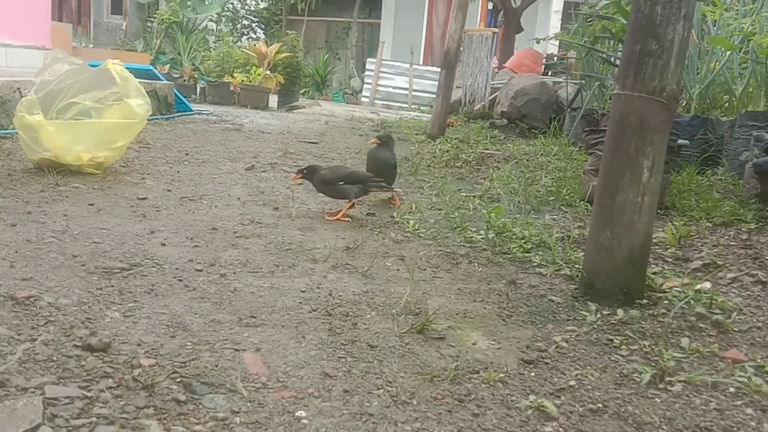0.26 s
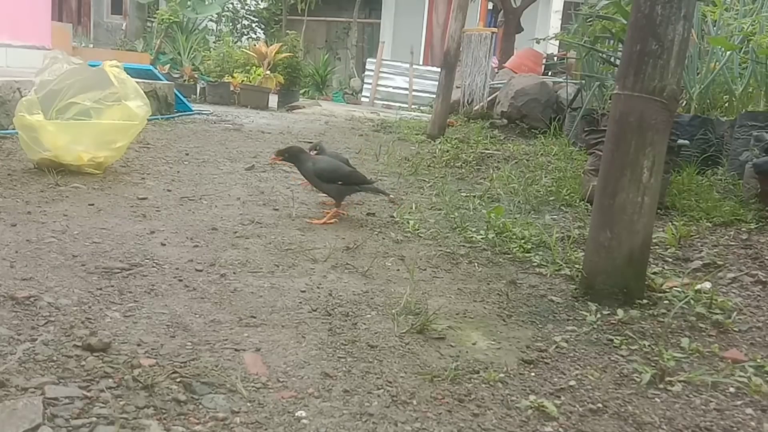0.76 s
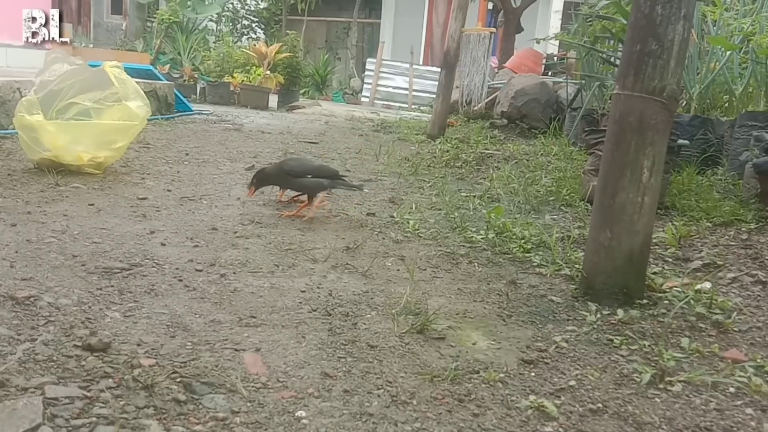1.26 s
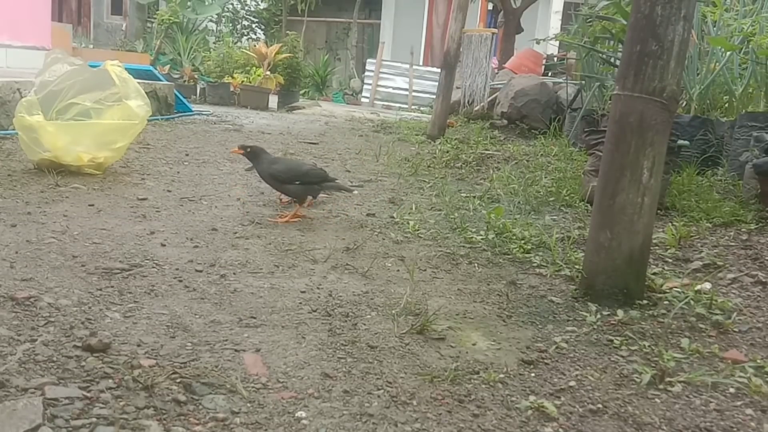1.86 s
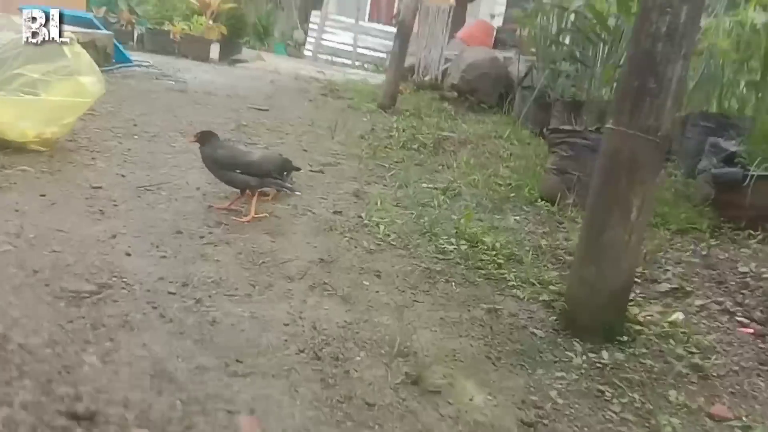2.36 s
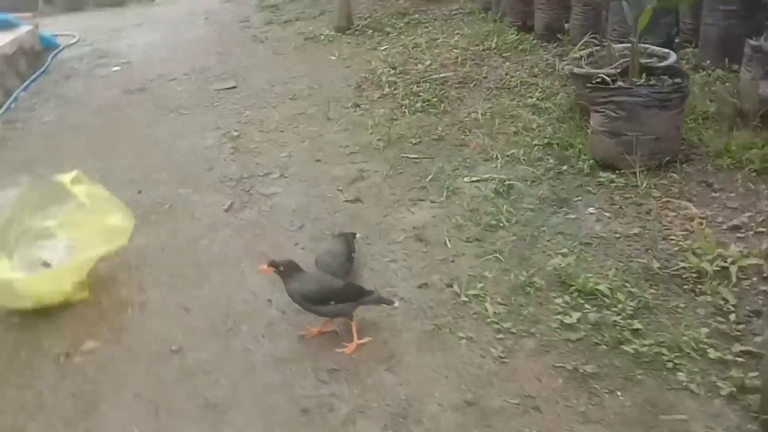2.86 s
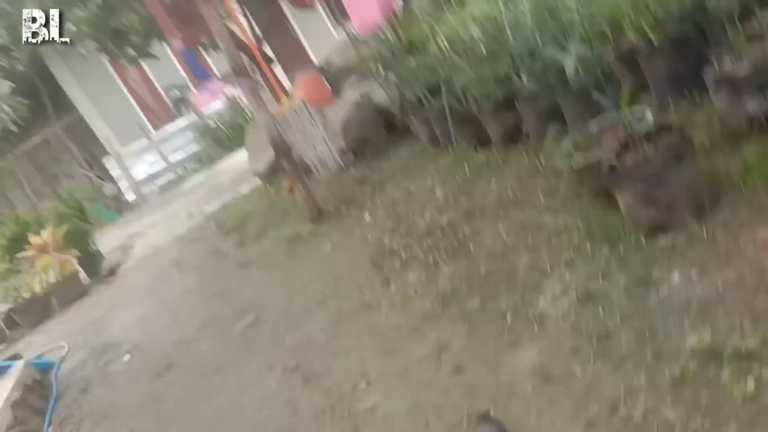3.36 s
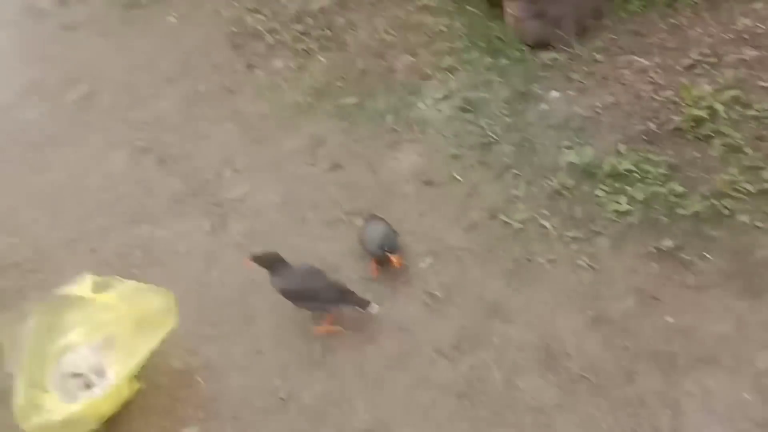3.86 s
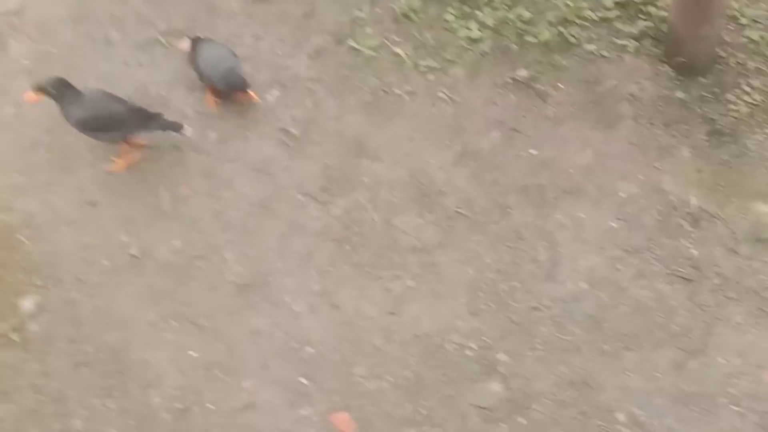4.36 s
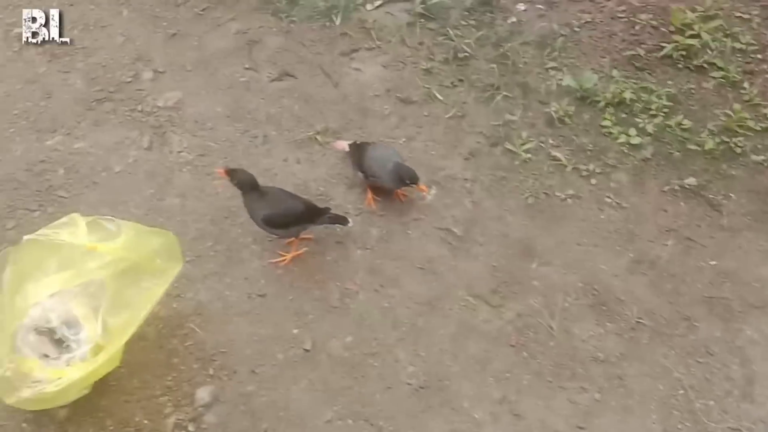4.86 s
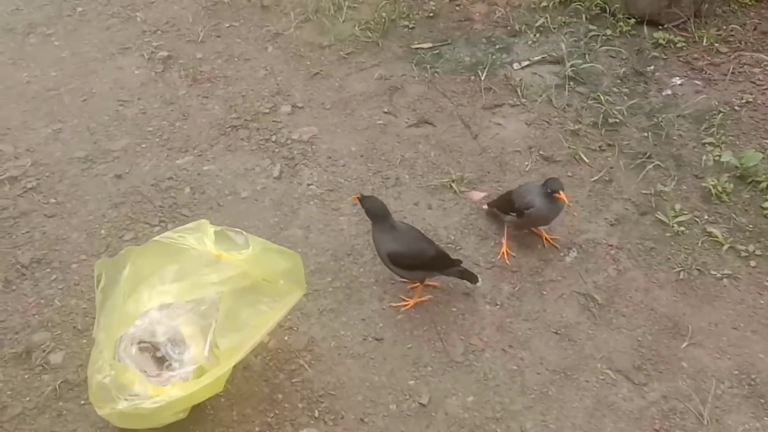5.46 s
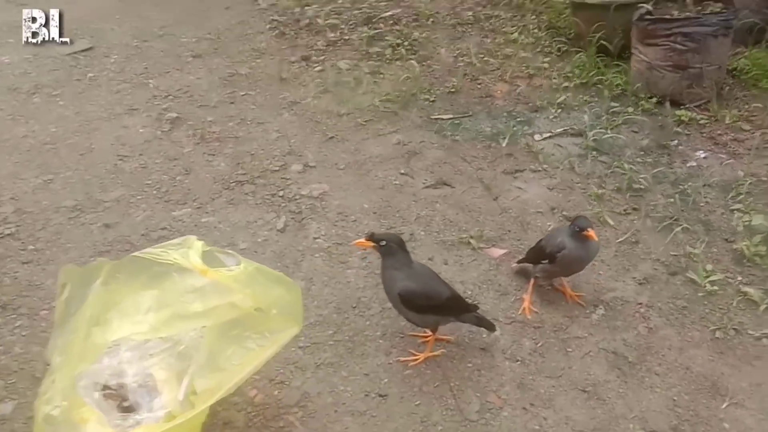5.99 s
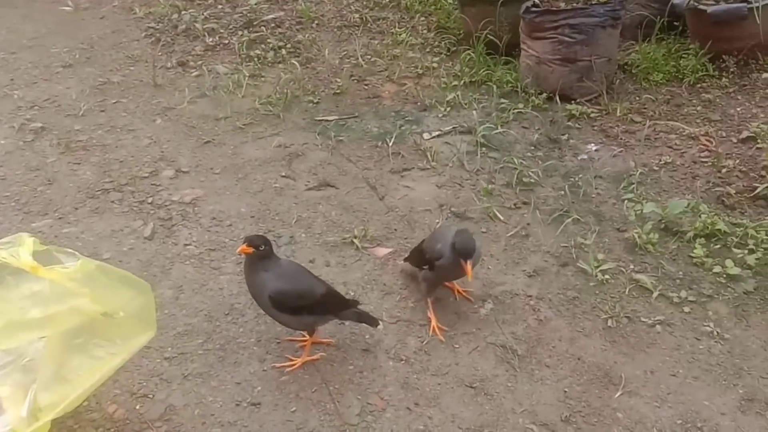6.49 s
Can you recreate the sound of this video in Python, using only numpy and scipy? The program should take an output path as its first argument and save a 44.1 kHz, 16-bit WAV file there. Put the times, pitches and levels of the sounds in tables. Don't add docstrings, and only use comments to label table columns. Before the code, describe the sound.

Two mynas whistle and squawk harshly in a gravel yard, with clicking, scuffing grit, chirping birds further off and a low distant rumble.

```python
import sys
import numpy as np
from scipy import signal
from scipy.fft import rfft, irfft, next_fast_len
from scipy.io import wavfile
from scipy.ndimage import uniform_filter1d, map_coordinates

SR = 44100
rng = np.random.default_rng(int(sys.argv[2]) if len(sys.argv) > 2 else 0)


def dump_mix(stems):
    frames = np.atleast_2d(stems).T
    limited = np.clip(frames, -1, 1)
    pcm = np.round(limited * 32767).astype(np.int16)
    wavfile.write(sys.argv[1], SR, pcm)


def boost(x):
    u = np.asarray(x, float) / 20
    return 10 ** u


N = 296793
T = np.arange(N) / SR

# (time [s], pitch [Hz], level [dB])
SQUEAK_CURVE = [
    (0.065, 920, -44),
    (0.098, 1034, -39),
    (.126, 1288, -33),
    (0.146, 1460, -40),
    (0.21, 1760, -40),
    (0.245, 2450, -38),
    (0.29, 2620, -38),
    (0.32, 1480, -43),
    (0.38, 1300, -50),
]
# (time [s], pitch [Hz], level [dB])
LONG_WHISTLE_CURVE = [
    (2.27, 1835, -65),
    (2.286, 1896, -41),
    (2.33, 1921, -29),
    (2.346, 1874, -38),
    (2.353, 1871, -23),
    (2.376, 1943, -20),
    (2.408, 1944, -11),
    (2.424, 1905, -26),
    (2.43, 1910, -17),
]
HELD_WHISTLE_CURVE = [
    (2.42, 1890, -20),
    (2.464, 1863, -14),
    (2.512, 1848, -29),
    (2.536, 1832, -19),
    (2.568, 1822, -24),
    (2.58, 1841, -33),
]
SOBBING_WHISTLE_CURVE = [
    (2.574, 1825, -30),
    (2.576, 1826, -34),
    (2.59, 1781, -21),
    (2.598, 1722, -30),
    (2.606, 1742, -21),
    (2.632, 1726, -38),
    (2.636, 1771, -37),
    (2.66, 1712, -43),
]
FALLING_WHISTLE_CURVE = [
    (2.744, 2050, -45),
    (2.754, 2085, -25),
    (2.762, 2164, -32),
    (2.772, 2155, -32),
    (2.784, 2077, -16),
    (2.806, 1955, -17),
    (2.844, 1849, -19),
    (2.866, 1809, -24),
    (2.895, 1812, -36),
]
HIGH_WHISTLE_CURVE = [
    (3.955, 3807, -50),
    (3.967, 4044, -38),
    (4.007, 3918, -22),
    (4.031, 3736, -26),
    (4.07, 3726, -45),
]
# (start [s], length [s], first pitch [Hz], last pitch [Hz], level [dB])
PIPS = [
    (5.709, .03, 2750, 2680, -41),
    (3.95, .011, 6150, 6150, -36),
    (6.382, .012, 5850, 6200, -8.5),
]
YELPS = [
    (2.427, .007, 2600, 2480, -29),
    (2.434, .012, 2520, 2330, -26),
    (2.448, .038, 2290, 2210, -23),
    (2.531, .008, 3650, 3800, -21),
    (2.538, .008, 3900, 4250, -13.5),
    (2.545, .007, 4250, 4400, -15),
]
RASPS = [(2.464, .022, 3250, 3250, -14.5), (2.464, .026, 6200, 6200, -15), (2.465, .012, 5200, 5400, -20),
         (2.484, .02, 3100, 3500, -16), (2.495, .01, 6700, 7100, -20), (2.501, .008, 3600, 5000, -13),
         (2.509, .01, 4900, 3300, -14), (2.519, .012, 4600, 4700, -18), (2.518, .014, 3400, 3300, -19),
         (2.51, .014, 8000, 8200, -23), (2.53, .028, 7700, 7700, -20), (2.553, .009, 5250, 4900, -10),
         (2.561, .01, 4700, 5200, -13), (2.556, .03, 4200, 4200, -16), (2.57, .018, 5300, 5000, -21),
         (2.772, .02, 6400, 6000, -35), (2.774, .018, 4700, 3900, -32), (5.71, .012, 5500, 5500, -42),
         (5.72, .008, 5000, 5100, -26), (5.723, .02, 6400, 5800, -17), (5.727, .018, 5500, 5000, -16),
         (5.742, .018, 5000, 4500, -15), (5.748, .012, 4300, 3700, -20), (5.757, .04, 3500, 3600, -24),
         (5.75, .022, 7200, 7000, -18), (5.74, .025, 9400, 8800, -36), (5.765, .016, 5600, 5900, -15),
         (5.779, .012, 6200, 6000, -14), (5.772, .02, 7300, 7200, -21), (5.77, .03, 4500, 4900, -19),
         (5.79, .022, 5900, 5500, -19), (5.8, .05, 5800, 5300, -26), (5.8, .05, 4400, 4600, -30),
         (6.373, .008, 5400, 6000, -26), (1.652, .013, 6200, 4500, -25), (1.815, .014, 6300, 5600, -36)]
# (start [s], end [s], level [dB])
HISSES = [
    (2.428, 2.47, -28),
    (2.46, 2.585, -25),
    (2.772, 2.792, -38),
    (5.725, 5.82, -27),
]
# (frequency [Hz], level [dB per Hz])
HISS_COLOUR = [(2000, -40), (3000, -6), (5200, 0), (8500, -9), (11000, -13), (15000, -8), (16000, -30)]
# (time [s], peak [dB], centre [Hz])
CRACKS = [(.2144, -30, 5200), (.232, -33, 7200), (.283, -26, 5500), (.361, -30, 6500), (2.781, -27, 6500),
          (.2573, -24, 6160), (.4673, -24, 5900), (.5713, -27, 4500), (.9824, -24, 5700),
          (1.0172, -19.5, 5460), (1.3778, -15, 6500), (1.4292, -18, 4840), (1.6545, -24, 5800),
          (1.714, -23, 5940), (2.0803, -24, 5360), (2.1685, -21, 4200), (3.264, -18, 7600),
          (3.7545, -24, 4500), (3.7578, -2.5, 3500), (3.8496, -22, 7500), (3.8561, -19, 2600),
          (3.8846, -33, 7100), (4.4019, -34, 5840), (4.7432, -26, 7300), (4.807, -27, 7400),
          (6.373, -22, 8500), (6.4696, -31, 9000)]
KNOCKS = [(.273, -20, 6000), (1.0396, -19, 3000), (1.1265, -32, 4700), (1.3582, -22, 4650),
          (1.5412, -30, 1900), (1.5686, -25, 3000), (1.9027, -36, 7460), (3.2159, -27, 6130),
          (3.2914, -33.5, 5560), (3.592, -35.5, 5800), (3.606, -36, 5450), (4.7125, -26, 6900),
          (5.2374, -27, 2500), (5.293, -44, 1300)]
# (time [s], peak [dB], time to fall 60 dB [s])
SPRAYS = [(.2563, -33, .04), (.2723, -33, .08), (.3257, -36, .15), (.4663, -39, .1), (.5701, -39, .06),
          (.982, -40, .15), (1.0181, -34, .05), (1.1248, -48, .04), (1.2695, -50, .03), (1.3049, -40, .15),
          (1.357, -35, .2), (1.4296, -28, .06), (1.5678, -42, .04), (1.6167, -44, .15), (1.6496, -33, .1),
          (1.71, -35, .08), (1.8128, -41, .1), (1.8861, -38, .1), (2.0602, -46, .08), (2.0807, -42, .04),
          (2.169, -30, .04), (3.1744, -46, .05), (3.349, -45, .05), (3.4443, -38, .08), (3.4638, -38, .1),
          (3.5805, -44, .02), (3.62, -45, .02), (3.7578, -22, .12), (3.8561, -34, .05), (4.7144, -34, .05),
          (4.7933, -38, .03), (4.9564, -47, .05), (5.0302, -44, .05), (5.0741, -35, .06),
          (5.0906, -38, .12), (5.1993, -40, .1), (5.4528, -47, .04), (5.5171, -49, .04), (6.4689, -36, .04),
          (6.646, -45, .04)]
# (frequency [Hz], level [dB per Hz])
SPRAY_COLOUR = [(1500, -22), (3000, -6), (7500, 1), (10000, -5), (13000, -8), (15000, -1), (16000, -8)]
# (time of top [s], grit [dB],
# rise per 20 dB [s], fall per 20 dB [s], body over grit [dB])
SCUFFS = [(.294, -41, .17, .3, 0), (.48, -49, .03, .05, -2), (.574, -38.5, .02, .035, -1),
          (.8, -61, .3, .1, -8), (1.016, -39, .04, .09, 1), (1.312, -47, .035, .05, -15),
          (1.374, -35, .03, .1, -1), (1.65, -36.5, .045, .11, -4), (1.824, -46, .04, .2, -7),
          (2.18, -51, .4, .2, -5), (3.25, -53, .15, .2, -3), (3.266, -38, .013, .011, -18),
          (3.462, -46, .05, .1, -1), (3.8, -56, .03, 1.5, -5), (4.3, -54, .2, .15, -4),
          (4.745, -45, .06, .015, -10), (4.812, -47, .02, .015, -25), (4.9, -57, .15, .2, 4),
          (5.1, -38, .05, .08, -2), (5.208, -41, .02, .045, -1), (5.472, -53, .03, .15, -4),
          (6.088, -55, .2, .5, -6), (6.5, -55, .03, 1.5, -7)]
# (frequency [Hz], level [dB per Hz])
GRIT_COLOUR = [(3820, -32), (6500, -5), (7390, 4), (10400, -22.5), (13500, -23), (14900, -13), (16000, -22)]
BODY_COLOUR = [(410, -27), (700, -9.5), (952, -10), (1250, -13), (1830, -3), (2460, -3), (6500, -6),
               (8450, -56), (14300, -120)]
# (start [s], end [s], level [dB])
HOLLOW_SWELLS = [
    (.05, .4, -42),
    (1.1, 1.7, -52),
    (1.8, 2.3, -50),
    (3.1, 3.75, -57),
    (4.3, 5.5, -50),
    (6.1, 6.73, -58),
]
# (time [s], pitch [Hz], level [dB])
CLEAR_CALLS = [
    [(.005, 3167, -46), (.015, 3144, -38), (.046, 3140, -33), (.058, 3217, -48)],
    [(.072, 4080, -42), (.079, 4182, -31), (.1, 4218, -39), (.13, 4185, -48)],
    [(.186, 3500, -42), (.202, 3360, -29), (.232, 3348, -37), (.241, 3290, -30), (.277, 3080, -33),
     (.301, 3042, -31), (.325, 3000, -44)],
    [(1.24, 2330, -52), (1.271, 2628, -41), (1.293, 2761, -50), (1.3, 2785, -34), (1.343, 2885, -42),
     (1.38, 2950, -50)],
]
CLEAR_CHAOS = .04, .08, .3, .07
# (start [s], length [s], first pitch [Hz], last pitch [Hz], level [dB])
FAR_CHIRPS = [(.615, .075, 3080, 3400, -34), (.678, .04, 4100, 3950, -36), (.848, .03, 3200, 3120, -42),
              (.985, .06, 2950, 3250, -33), (1.042, .08, 3470, 3370, -31), (1.15, .05, 1720, 1800, -50),
              (1.178, .045, 2600, 1650, -44), (1.215, .04, 1700, 2400, -49), (1.415, .065, 3050, 3150, -34),
              (1.47, .06, 3050, 3300, -41), (1.595, .04, 2750, 2650, -43), (1.675, .06, 2400, 2800, -46),
              (3.44, .09, 2520, 2600, -53), (3.57, .05, 3900, 3780, -50), (3.63, .1, 3620, 3480, -53)]
# (start [s], end [s], first pitch [Hz], last pitch [Hz], level [dB])
CHATTER = [(.066, 0.138, 3500, 3680, -39.5), (0.21, 0.35, 2700, 1900, -40), (0.368, 0.499, 2420, 2103, -44),
           (0.505, 0.594, 2303, 2530, -48.5), (0.666, 0.795, 3336, 3620, -50),
           (0.858, 0.961, 3500, 3750, -55), (1.174, 1.243, 2687, 1980, -45.5),
           (1.44, 1.56, 2406, 2870, -43), (1.456, 1.519, 3850, 3800, -46.5),
           (2.037, 2.154, 3280, 3580, -59), (2.054, 2.152, 4700, 4620, -50.5),
           (2.89, 3.053, 3150, 2800, -52), (3.528, 3.572, 3200, 3380, -47.5),
           (3.711, 3.747, 2610, 2658, -46), (5.201, 5.227, 2605, 2530, -36),
           (6.527, 6.677, 3890, 4000, -60.5), (2.778, 2.789, 4280, 4100, -24),
           (3.947, 3.974, 3100, 3130, -53), (3.942, 4, 5300, 5020, -51), (5.725, 5.765, 2720, 2620, -51),
           (.63, .67, 2150, 2250, -49), (.67, .76, 2900, 2500, -47), (.85, .92, 2900, 2650, -51),
          (1.07, 1.13, 2200, 2150, -53), (1.59, 1.65, 3100, 2400, -47), (1.68, 1.76, 3000, 3200, -50),
          (3.04, 3.14, 2300, 2250, -52), (3.35, 3.42, 1950, 2050, -55), (3.52, 3.62, 2550, 2450, -55),
          (3.68, 3.75, 3450, 3300, -50), (3.7, 3.75, 2150, 2100, -52), (4.02, 4.11, 2100, 1700, -56),
          (4.76, 4.9, 3600, 3900, -60), (4.88, 4.98, 2300, 2900, -58), (5.03, 5.07, 2200, 2000, -52),
          (5.45, 5.51, 1900, 1950, -57), (6.05, 6.3, 2000, 2300, -60), (6.58, 6.64, 2900, 2000, -56)]
# (time [s], level [dB], time to fall 60 dB [s])
TANK_BLOWS = [
    (1.62, -33, .3),
    (1.79, -36, .4),
    (1.93, -40, 3.2),
]
# (start [s], end [s], pitch [Hz], level [dB])
HUMS = [
    (0.03, 0.403, 280.2, -51),
    (0.445, 0.894, 258, -58),
    (1.96, 2.356, 281.3, -55),
    (4.355, 4.69, 277, -58.5),
    (5.05, 5.35, 278, -62),
    (5.416, 5.982, 171.6, -41.5),
    (5.66, 6, 280, -56),
    (6.304, 6.697, 278, -57.5),
    (6.305, 6.607, 137.7, -43),
]
# (time [s], level [dB])
TRAFFIC_LEVEL = [(0, -50), (0.19, -43), (0.72, -44), (0.97, -51), (1.1, -41), (1.26, -49), (1.62, -45),
                 (1.69, -40), (1.8, -45), (2, -40), (2.7, -50), (3.5, -50), (3.65, -45), (4.12, -51),
                 (4.46, -44), (5.29, -53), (5.36, -43), (6.73, -45)]
# (frequency [Hz], level [dB per Hz])
TRAFFIC_COLOUR = [(15, -70), (25, -30), (43, -17), (63, -7), (128, 3.5), (243, -11), (352, -14.5),
                  (392, -27.5), (600, -20.5), (780, -45), (1320, -120)]
AIR_COLOUR = [(180, -34.5), (300, -3), (1010, -12.5), (1230, 0), (1430, -12.5), (4300, -14), (4590, -10.5),
              (4990, -24.5), (6000, -9), (6620, -22.5), (7570, -13.5), (10000, -33), (13500, -38.5),
              (15000, -20.5), (16000, -31)]
STREET_COLOUR = [(150, -38), (250, 1), (500, -4.5), (900, -6.5), (1300, -38.5)]
# (start [s], end [s], extra level [dB])
STREET_SWELLS = [
    (.8, 1.5, 2),
    (1.55, 2.45, 5),
    (3.8, 4.1, 3),
    (5.3, 6.73, 3),
]
# (frequency [Hz], time to fall 60 dB [s])
WALL_FADES = [(500, 0.12), (2000, 0.28), (6000, 0.25), (12000, 0.23)]
# (frequency [Hz], gain [dB])
PORT_GAIN = [(300, 1), (1000, 2), (8000, 1.5), (10000, -5), (13500, -11), (15400, -5), (15800, -35)]


def mynas():
    return squeak() + boost(-2.2) * whistles() + pips() + yelps() + beaked_rasps()


def squeak():
    rows = coloured(SQUEAK_CURVE, slope_db=-14, per_db=0, per_octave=4)
    voice = note(rows, edge=.005, chaos=.21, lumps=1.5)
    return filtered(voice, lambda f: (1 + 3.5 * peak(f, 7200, 3000)) / (1 + (f / 9500) ** 8))


def whistles():
    chaos = .015
    out = np.zeros(N)
    for curve in (LONG_WHISTLE_CURVE, FALLING_WHISTLE_CURVE, HIGH_WHISTLE_CURVE):
        rows = coloured(curve, slope_db=-20.5, per_db=.35, per_octave=12)
        out += note(rows, edge=.0045, chaos=chaos, droop=.45)
    for curve in (HELD_WHISTLE_CURVE, SOBBING_WHISTLE_CURVE):
        out += note(curve, edge=.004, chaos=chaos, slope_db=-38)
    return filtered(out, lambda f: 1 - .9 * peak(f, 10200, 4000))


def pips():
    return sum(note(burst(row), edge=.002, slope_db=-27, chaos=.08) for row in PIPS)


def yelps():
    out = np.zeros(N)
    for row in YELPS:
        rows = coloured(burst(row), slope_db=3, per_db=0, per_octave=20)
        out += note(rows, edge=.0016, chaos=.12, droop=1.4)
    return filtered(out, lambda f: (.6 + 1.6 * peak(f, 4500, 1500)) / (1 + (f / 10500) ** 8))


def beaked_rasps():
    voice = np.zeros(N)
    for row in RASPS:
        rows = coloured(burst(row), slope_db=-9, per_db=0, per_octave=5)
        voice += note(rows, edge=.0022, chaos=.36)
    hiss_gain = sum(boost(db) * swell(a, b) for a, b, db in HISSES)
    rasps = boost(.3) * voice + boost(3 * wobble(400)) * noise(HISS_COLOUR) * hiss_gain

    def beak(bass_hz, top_hz):
        return filtered(rasps, lambda f: 1 / (1 + (bass_hz / (f + 1)) ** 18) / (1 + (f / top_hz) ** 4))

    narrow = beak(2500, 1.15 * 10500)
    wide = filtered(beak(3330, 2 * 10500), lambda f: 1 - .65 * peak(f, 9000, 2500))
    return np.where(T < 5, narrow, wide)


def clicks():
    size = 900
    out, t = np.zeros(N + size), np.arange(size) / SR
    hits = [(*row, -21) for row in CRACKS] + [(*row, -5) for row in KNOCKS]
    c, d = signal.iirpeak(3600, 1.2, SR)
    for s, db, hz, knock_db in hits:
        fade = boost(-60 * t / .008) + boost(-13 - 60 * t / .03)
        strike = rng.standard_normal(size) * fade + 5 * (t == 0)
        b, a = signal.iirpeak(np.clip(hz, 500, 15000), 2.1, SR)
        own = signal.lfilter(b, a, signal.lfilter(b, a, strike))
        shared = signal.lfilter(c, d, signal.lfilter(c, d, strike))
        crack = own + .4 * shared + .06 * strike
        knock = boost(knock_db - 60 * t / .025) * np.sin(2 * np.pi * 1250 * t)
        out[round(s * SR):][:size] += boost(db + 1.0) * (crack / np.abs(crack).max() + knock)
    return out[:N]


def sprays():
    gain, t = np.zeros(N + SR // 4), np.arange(SR // 4) / SR
    for s, db, t60 in SPRAYS:
        gain[round(s * SR):][:len(t)] += boost(db - 9 - 60 * t / t60)
    uneven = boost(5.5 * rng.standard_normal(N))
    grains = gain[:N] * unit(uneven * rng.standard_normal(N) * boost(3.5 * wobble(300)))
    hz = np.fft.rfftfreq(4096, 1 / SR)
    colour_rms = np.sqrt(np.mean(boost(2 * along(SPRAY_COLOUR, hz))))
    return filtered(grains, lambda f: boost(along(SPRAY_COLOUR, f))) / colour_rms


def scuffs():
    grit_gain, body_gain = np.zeros(N), np.zeros(N)
    for s, db, rise, fall, body_db in SCUFFS:
        stroke = boost(db - 20 * np.maximum((s - T) / rise, (T - s) / fall))
        grit_gain += stroke
        body_gain += stroke * boost(body_db)
    swells = sum(boost(db) * swell(a, b) for a, b, db in HOLLOW_SWELLS)
    hollow_gain = boost(1) * body_gain + boost(3 * wobble(8)) * swells
    landings = rng.random(N) < 2500 / SR
    grains = landings * boost(2.5 * rng.exponential(size=N)) * rng.standard_normal(N)
    grains = (unit(grains) + 1.34 * rng.standard_normal(N)) * boost(3.66 * wobble(70))
    grit = unit(filtered(grains, lambda f: boost(along(GRIT_COLOUR, f))))
    body = unit(filtered(grains, lambda f: boost(along(BODY_COLOUR, f))))
    hollow = unit(filtered(rng.standard_normal(N), lambda f: peak(f, 1238, 109) + .04 * peak(f, 800, 1200)))
    return boost(-1.1) * grit_gain * grit + boost(2.5) * body_gain * body + boost(-4.0) * hollow_gain * hollow


def far_birds():
    out = np.zeros(N)
    for curve, chaos in zip(CLEAR_CALLS, CLEAR_CHAOS):
        out += note(curve, edge=.004, slope_db=-40, chaos=chaos, lumps=20 * chaos)
    for row in FAR_CHIRPS:
        out += note(burst(row, more_sag_db=5), edge=.004, slope_db=-40, chaos=.19, lumps=2.8)
    for a, b, hz0, hz1, db in CHATTER:
        out += note([(a, hz0, db), (b, hz1, db - 6)], edge=.012, slope_db=-22, chaos=.58, lumps=3.5)
    return out


def tank():
    ring = np.zeros(N)
    for s, db, t60 in TANK_BLOWS:
        since = np.clip(T - s, 0, None)
        ring += boost(db + 4 - 60 * (since / t60) ** 1.6) * (1 - np.exp(-since / .03))
    return ring * boost(2 * wobble(9)) * np.sin(2 * np.pi * 63.6 * T)


def far_hums():
    return sum(boost(db + 3.5) * swell(a, b) * np.sin(2 * np.pi * hz * T) for a, b, hz, db in HUMS)


def traffic():
    return boost(np.interp(T, *np.transpose(TRAFFIC_LEVEL)) + 4.4 * wobble(10)) * noise(TRAFFIC_COLOUR)


def open_air():
    air = boost(-53.5 + 1.2 * wobble(2.993)) * patchy(noise(AIR_COLOUR), depth_db=4.3)
    street_db = -62 + 4 * wobble(8) + sum(db * swell(a, b) for a, b, db in STREET_SWELLS)
    return air + boost(street_db) * patchy(noise(STREET_COLOUR), depth_db=3)


def walls(x):
    out, step = np.zeros(N + SR), SR // 4
    for i in range(0, N, step):
        hz, t, z = signal.stft(rng.standard_normal(SR // 2), SR, nperseg=256)
        fade = boost(-60 * t / along(WALL_FADES, hz)[:, None])
        tail = signal.istft(z * fade, SR, nperseg=256)[1]
        wet = signal.fftconvolve(x[i:i + step], tail / np.linalg.norm(tail))
        out[i + 300:][:len(wet)] += wet
    return out[:N]


def note(rows, edge, chaos, slope_db=None, droop=1, lumps=0):
    s, hz, db, *more = np.transpose(rows)
    t = T[round(s[0] * SR):round(s[-1] * SR)]
    size = len(t)
    hz, db, *more = [np.interp(t, s, column) for column in (hz, db, *more)]
    slope_db = more[0] if slope_db is None else slope_db
    hz = hz * np.exp(chaos * (.0498 * wobble(397.5, size) + .145 * wobble(2500, size)))
    phase = 2 * np.pi * np.cumsum(hz) / SR
    tone = np.zeros(size)
    for k in range(1, 9):
        waver_db = (rng.normal(0, 2) + 4 * wobble(60, size)) * (k > 1)
        level = boost(slope_db * np.log2(k) ** droop + waver_db)
        tone += level * (k * hz < SR / 2.5) * np.sin(k * phase + k * k)
    flutter_hz = 550 * np.exp(.35 * wobble(250, size))
    flutter = np.cos(2 * np.pi * np.cumsum(flutter_hz) / SR)
    pulses = boost(chaos * (12 * flutter + 6 * wobble(300, size)))
    beats = unit(pulses + lumps * wobble(70, size))
    fade = np.sin(np.pi / 2 * np.clip(np.minimum(t - t[0], t[-1] - t) / edge, 0, 1)) ** 2
    out = np.zeros(N)
    out[round(s[0] * SR):][:size] = np.sqrt(2) * boost(db) * tone * beats * fade
    return out


def burst(row, more_sag_db=0):
    s, length, hz0, hz1, db = row
    top = .35
    return [(s, hz0, db - 4),
            (s + top * length, hz0 + top * (hz1 - hz0), db),
            (s + length, hz1, db - 7 - more_sag_db)]


def coloured(rows, slope_db, per_db, per_octave):
    out = []
    for s, hz, db in rows:
        slope = slope_db - per_db * (db + 30) - per_octave * np.log2(hz / 2000)
        out.append((s, hz, db, min(0, slope)))
    return out


def swell(a, b):
    return np.sqrt(np.clip(np.sin(np.pi * np.clip((T - a) / (b - a), 0, 1)), 0, 1))


def wobble(rate, size=N):
    knots = rng.standard_normal(int(size * rate / SR) + 4)
    return map_coordinates(knots, [np.arange(size) * rate / SR])


def noise(spectrum):
    return unit(filtered(rng.standard_normal(N), lambda f: boost(along(spectrum, f))))


def patchy(x, depth_db):
    z = signal.stft(x, nperseg=512)[2]
    field = uniform_filter1d(uniform_filter1d(rng.standard_normal(z.shape), 4, 0), 16, 1)
    return unit(signal.istft(z * boost(depth_db * unit(field)), nperseg=512)[1][:N])


def filtered(x, response):
    m = next_fast_len(N + SR // 4)
    return irfft(rfft(x, m) * response(np.fft.rfftfreq(m, 1 / SR)), m)[:N]


def peak(f, hz, width):
    return 1j * f * width / (hz * hz - f * f + 1j * f * width)


def along(points, hz):
    f, v = np.transpose(points)
    return np.interp(np.log(hz + 1), np.log(f + 1), v)


def unit(x):
    return x / np.sqrt(np.mean(x ** 2) + 1e-20)


def scene():
    near, far, stones = mynas(), far_birds(), clicks()
    echoes = walls(boost(-9.5) * near + boost(-2.5) * far + boost(-20.5) * stones)
    voices = filtered(near + boost(1.5) * far + stones + echoes, lambda f: boost(along(PORT_GAIN, f)))
    ground = scuffs() + sprays()
    low_end = traffic() + tank() + far_hums()
    return (voices + ground + low_end + open_air())[None]


def low_pass(x):
    return signal.sosfilt(signal.butter(12, 16620, fs=SR, output="sos"), x)


def record(dry):
    x = filtered(dry[0], lambda f: 1 - .87 * peak(f, 6590, 460) - (f > 15950))
    x = x / (1 + np.abs(x / .99) ** 16) ** (1 / 16)
    return low_pass(x[None])


dry = scene()
out = record(dry)
dump_mix(out)
```